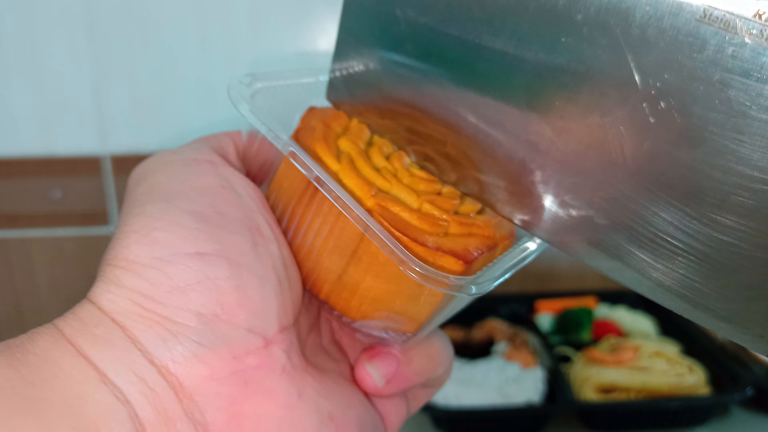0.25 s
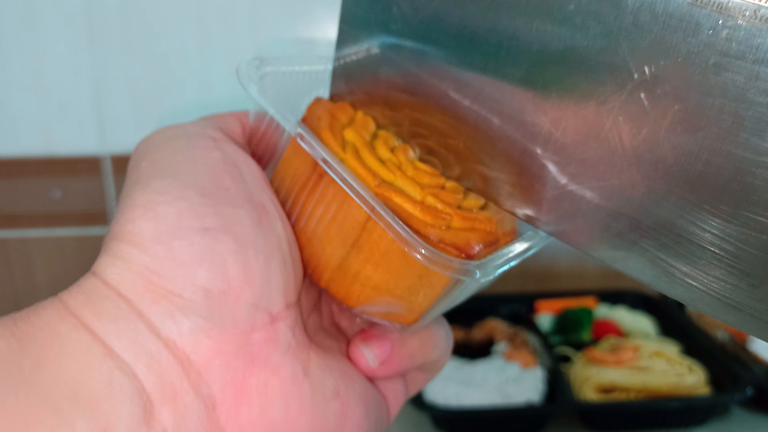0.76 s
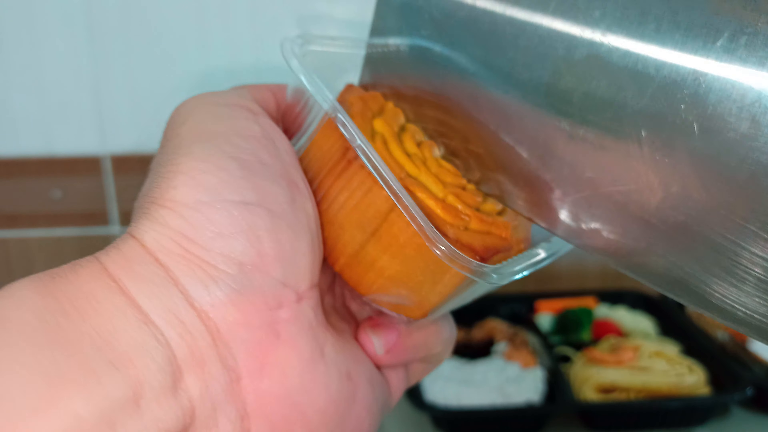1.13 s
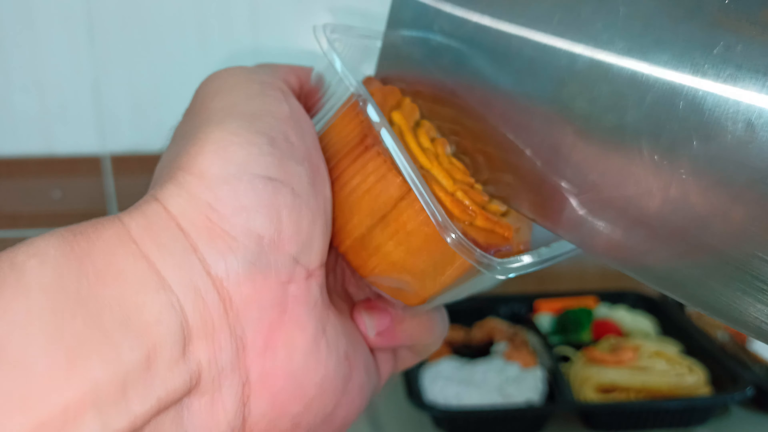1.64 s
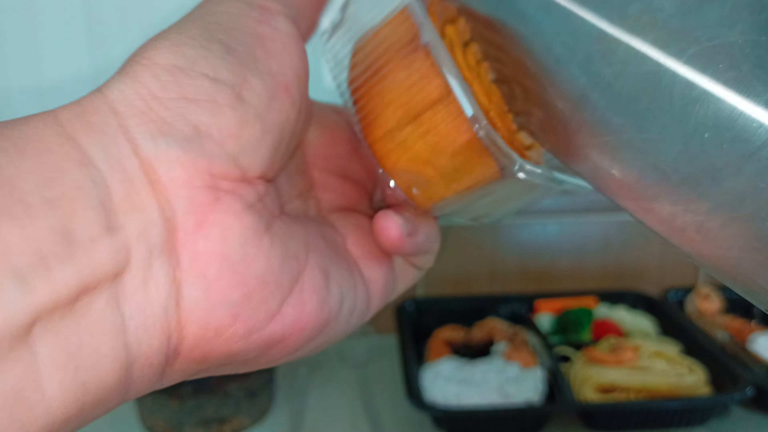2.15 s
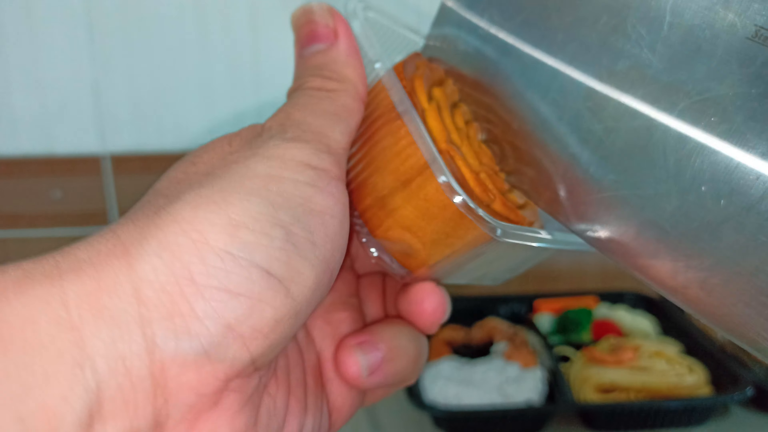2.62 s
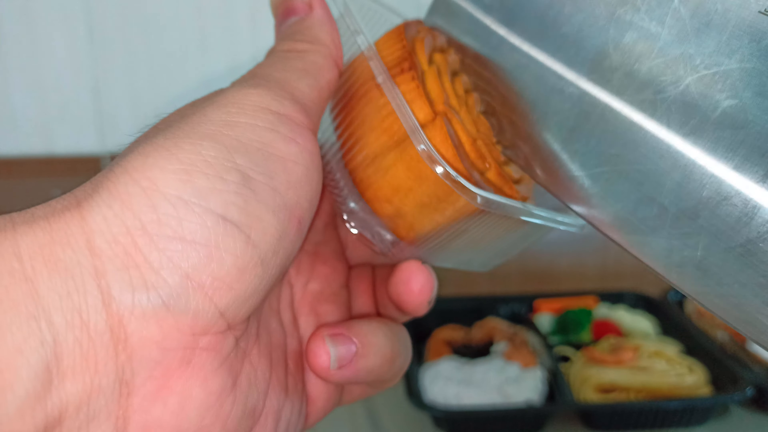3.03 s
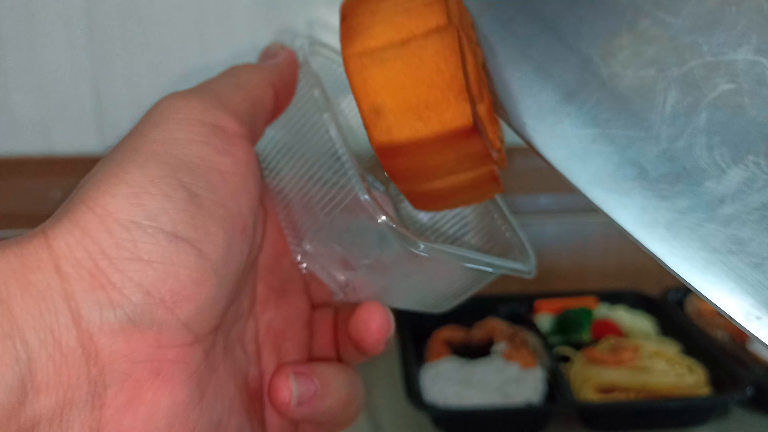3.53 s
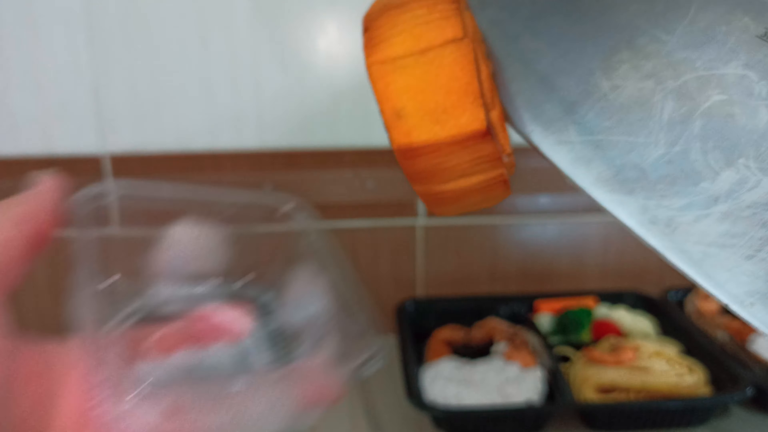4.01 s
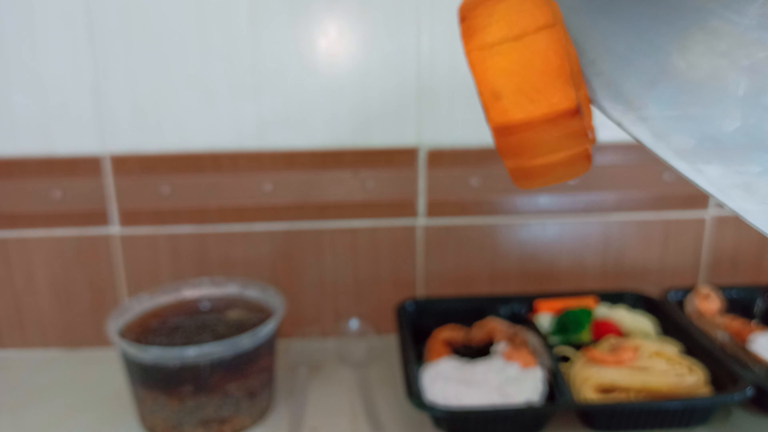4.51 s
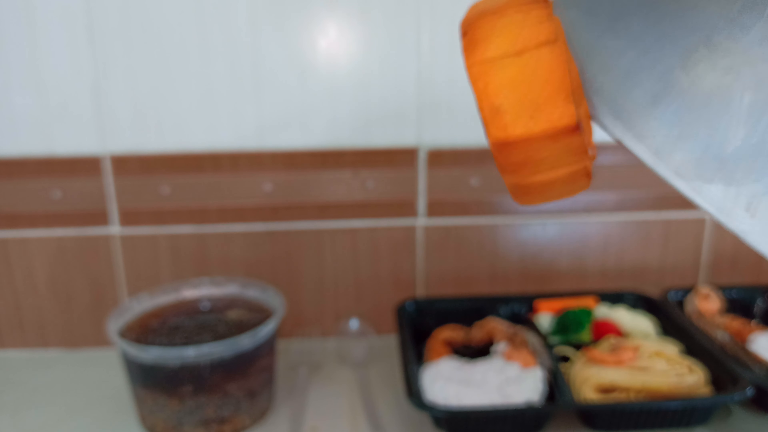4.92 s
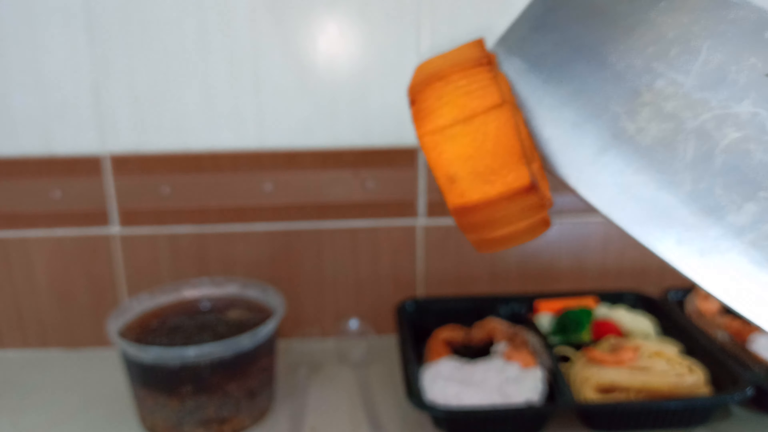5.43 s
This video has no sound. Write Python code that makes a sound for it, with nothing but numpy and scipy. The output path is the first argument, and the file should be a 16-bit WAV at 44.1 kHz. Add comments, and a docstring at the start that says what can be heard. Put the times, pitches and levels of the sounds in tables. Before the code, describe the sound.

A thin plastic tray snaps and crackles as a hand flexes it, followed by soft brushing and a dull clatter over a low hum.

```python
"""Flexing a plastic food tray

A hand flexes a thin tray in a tiled room until a pastry comes free on a metal blade. Panels buckle
in sharp snaps, creases tick, fingers rub. Soft brushing, scrapes and a dull clatter follow.
A refrigerator hums low; a limiter ducks around the loudest snaps."""
import sys
import numpy as np
from scipy import signal
from scipy.fft import rfft, irfft
from scipy.io import wavfile
from scipy.ndimage import uniform_filter1d, minimum_filter1d

SR = 44100
rng = np.random.default_rng(int(sys.argv[2]) if len(sys.argv) > 2 else 0)


def inscribe(sig):
    """Save sig as 16-bit PCM at rate SR to the path in sys.argv[1].

    A 1-D sig is mono; a 2-D sig holds one channel per row.
    Samples are clipped to [-1, 1] before scaling.
    """
    pcm = np.round(np.clip(np.atleast_2d(sig).T, -1, 1) * 32767)
    wavfile.write(sys.argv[1], SR, pcm.astype(np.int16))


N = 249606
HIT_SAMPLES = 8192
HIT_S, HIT_HZ = np.arange(HIT_SAMPLES) / SR, np.fft.rfftfreq(HIT_SAMPLES, 1 / SR)
TEN_MS_GAIN = np.sqrt(SR / 100)  # energy 1 to rms 1 over 10 ms
LET_GO_S = 3.07

# Colour shared by the last two snaps, one loud, bright double crack.
# Each row: frequency in Hz, gain in dB.
RELEASE = [(300, -22), (1000, -13.5), (1400, -12), (1900, -35), (2850, -5), (3700, -18), (4500, 0),
           (7200, 1.5), (8300, -7.5), (10200, -14), (13000, -12), (16000, -15.5)]


def amp(db):
    """Decibels to gain."""
    return 10 ** (np.asarray(db) / 20)


def unit_rms(x):
    """Scale to rms 1."""
    return x / np.sqrt(np.mean(x ** 2) + 1e-20)


def unit_energy(x):
    """Scale to energy 1."""
    return x / np.linalg.norm(x)


def curve_at(points, hz):
    """Interpolate (Hz, value) points over log frequency."""
    point_hz, value = np.transpose(points)
    return np.interp(np.log(hz + 1), np.log(point_hz + 1), value)


def add(mix, start_s, sound):
    """Mix a sound in place."""
    part = mix[round(start_s * SR):][:len(sound)]
    part += sound[:len(part)]


def decay(t60_s):
    """Exponential envelope of one hit."""
    return np.exp(-np.log(1000) * HIT_S / t60_s)


def mode(hz, db, t60_s):
    """One damped sine."""
    return amp(db) * decay(t60_s) * np.sin(2 * np.pi * hz * HIT_S)


def crack(flutter_db, t60_s):
    """An impulse, then dense flutter; flutter_db is its energy against the impulse."""
    drive = amp(flutter_db) * unit_energy(rng.standard_normal(HIT_SAMPLES) * decay(t60_s))
    drive[0] = 1
    return drive


def strike(drive, colour_db):
    """Minimum-phase colouring of one hit; energy 1."""
    log_gain = np.log(amp(np.maximum(colour_db, -90)))
    mirrored = np.concatenate([log_gain, log_gain[-2:0:-1]])
    log_spectrum = np.conj(signal.hilbert(mirrored))[:len(HIT_HZ)]
    response = irfft(np.exp(log_spectrum))
    return unit_energy(signal.fftconvolve(drive, response)[:HIT_SAMPLES])


def tint(x, colour):
    """Colour a scene-length signal; rms 1."""
    hz = np.fft.rfftfreq(N, 1 / SR)
    return unit_rms(irfft(rfft(x) * amp(curve_at(colour, hz)), N))


def drift(rate_hz):
    """Slow random motion; rms 1."""
    hz = np.fft.rfftfreq(N, 1 / SR)
    low_pass = np.exp(-(hz / rate_hz) ** 2)
    return unit_rms(irfft(rfft(rng.standard_normal(N)) * low_pass, N))


def fridge_hum(waver_hz=0.86, waver_db=3, steadier_hz=600):
    """Motor hum; the low lines waver most in level."""
    # Each row: frequency in Hz, rms level in dB.
    lines = [(97, -65), (145.5, -54.5), (242.8, -61.5), (292, -64.5), (488.5, -63.5), (1806, -74)]
    out = np.zeros(N)
    for hz, db in lines:
        level = amp(db + waver_db / (1 + hz / steadier_hz) * drift(rate_hz=2.6))
        phase = 2 * np.pi * np.cumsum(hz + waver_hz * drift(rate_hz=4.3)) / SR
        out += level * np.sqrt(2) * np.sin(phase)
    return out


def room_air(rms_db=-51.5):
    """Steady air noise and hiss."""
    # Each row: frequency in Hz, gain in dB.
    colour = [(24, -51.5), (36, -31.5), (50, 3.5), (70, -5.5), (110, 4.5), (190, -6.5), (310, -3.5),
              (430, -13.5), (630, -15), (1300, -22), (1800, -24), (2500, -29), (4000, -26), (6500, -33.5),
              (8000, -24.5), (9200, -42.5), (16000, -39)]
    return amp(rms_db) * tint(rng.standard_normal(N), colour)


def handling(work_db=-48, idle_db=-57.5, rise_s=0.5, fall_s=0.23):
    """Hand rumble builds with the grip and sinks to idle once the pastry is out."""
    # Each row: frequency in Hz, gain in dB.
    colour = [(24, -57.5), (36, -30), (52, -13), (100, 2.5), (200, -3.5), (400, -2.5), (600, -17.5),
              (1500, -25), (4000, -48.5)]
    t = np.arange(N) / SR
    effort = (1 - np.exp(-t / rise_s)) * np.exp(-np.maximum(t - LET_GO_S, 0) / fall_s)
    level = np.hypot(amp(idle_db), amp(work_db) * effort)
    return level * tint(rng.standard_normal(N), colour)


def crease(peak_db, hz, treble_db, q=1.76):
    """A crease gives way: a tiny crack through one broad resonance, plus treble."""
    resonance = 1 / np.hypot(1, q * (HIT_HZ / hz - hz / (HIT_HZ + 1)))
    treble = amp(treble_db) * HIT_HZ / np.hypot(HIT_HZ, 5000)
    colour_db = 20 * np.log10(np.hypot(resonance, treble))
    sound = strike(crack(flutter_db=3.5, t60_s=0.018), colour_db)
    return amp(peak_db) * sound / abs(sound).max()


def crackle(grip_s=0.05, per_s=16, peak_db=-40, spread_db=1.5, centre_hz=4400, spread_octaves=0.35):
    """Faint creases while the hand flexes the tray, one at a random time in each slot."""
    out = np.zeros(N)
    for slot_s in np.arange(grip_s, LET_GO_S, 1 / per_s):
        strength, pitch = rng.standard_normal(2)
        hz = centre_hz * 2 ** (spread_octaves * pitch)
        sound = crease(peak_db + spread_db * strength, hz, treble_db=-14)
        add(out, slot_s + rng.random() / per_s, sound)
    return out


def friction(strokes, colour, slips_per_s=2500, spread_db=2.0, edge_db=-20):
    """Dense, uneven slips; each stroke is at edge_db one rise before and one fall after its peak."""
    slips = (rng.random(N) < slips_per_s / SR) * rng.choice([-1, 1], N)
    sizes = amp(spread_db * np.minimum(rng.exponential(1, N), 4))
    t = np.arange(N) / SR
    envelope = np.zeros(N)
    for peak_s, rise_s, fall_s, db in strokes:
        off_peak = np.maximum((peak_s - t) / rise_s, (t - peak_s) / fall_s)
        envelope += amp(db + edge_db * off_peak)
    return tint(slips * sizes, colour) * envelope


def finger_rubs():
    """Fingers slide on the plastic."""
    # Each row: peak time, rise and fall in seconds, level in dB.
    strokes = [(.14, .04, .07, -56.5), (.88, .04, 0.4, -49), (1.94, .035, 0.025, -50),
               (2.076, .022, 0.013, -33.5)]
    # Each row: frequency in Hz, gain in dB.
    colour = [(300, -5.5), (1200, -12), (2800, -8), (6000, -7.5), (8500, -12), (11000, -30), (16000, -15.5)]
    return friction(strokes, colour)


def ticks():
    """The larger creases give way one by one."""
    # Each row: start in seconds, peak level in dB, resonance in Hz, treble in dB.
    creases = [(0.149, -31.5, 2650, -27), (0.163, -26.5, 3700, -9), (0.21, -38, 3170, -18),
               (0.241, -29, 2460, -9), (0.303, -27.5, 2580, -15), (.905, -23.5, 5360, -20),
               (1.029, -26.5, 2570, -40), (1.4427, -29.5, 2760, -13), (1.8292, -36, 5000, -7),
               (2.094, -11, 3550, -20), (2.1112, -19.5, 3164, -13), (2.123, -10, 3000, -23),
               (2.132, -14, 3050, -24), (2.3985, -24.5, 3000, -26), (2.4436, -23, 3060, -32),
               (2.494, -20, 4550, -25), (2.5332, -26, 2870, -31), (2.705, -25, 1950, -13.5),
               (2.8648, -29.5, 2430, -34), (2.872, -29.5, 2650, -25), (2.9959, -32.5, 2430, -35),
               (4.646, -32, 14000, 7)]
    out = np.zeros(N)
    for start_s, peak_db, hz, treble_db in creases:
        add(out, start_s, crease(peak_db, hz, treble_db))
    return out


def snaps(evenness=0.46, lift_db=2, bounce_db=-14, bounce_t60_s=0.12):
    """Panels buckle with a crack and flutter. Returns direct sound and a more evenly coloured send."""
    # Each row: start in seconds, level over 10 ms in dB, flutter in dB, flutter t60 in seconds,
    # relative ring level in dB, colour as (Hz, dB) points.
    panels = [ (0.3307, -13.5, -8, 0.033, -29, [(300, -16), (600, -38), (1000, -23.5), (1400, -22.5),
              (2050, -3), (2800, 0), (5100, -2.5), (7200, -8), (11000, -15.5), (14000, -7), (16000, -22)]),
              (0.51, -15, 3.5, 0.017, -24, [(300, -29), (600, -18), (1000, 0), (1800, -15.5), (2800, 4),
              (4500, -1), (7100, 9.5), (9500, -0.5), (12000, -6), (15200, 8), (16000, 0)]),
              (0.5347, -28, -4.5, 0.06, -31, [(250, -27), (400, -0.5), (630, -22), (900, -10), (1900, -11),
              (2670, 4.5), (3300, -3.5), (5000, -5.5), (7600, -17), (11000, -18), (16000, -26)]),
              (0.6524, -15.5, -1, 0.014, -28, [(300, -23), (600, -31), (1000, -14), (1400, -18.5),
              (1850, -4.5), (2350, -8.5), (2800, 6), (3700, -1.5), (4600, -6), (5600, -24.5), (7300, -5),
              (10000, -12), (13000, -13), (15200, -12.5)]), (1.4540, -28, -5, 0.074, -20, [(350, -34),
              (750, 7), (1350, -5), (1600, -8), (2450, -3), (2820, 5), (3200, -0.5), (6300, -8),
              (7300, -0.5), (9500, -10), (12000, -11), (15300, -9.5)]),
              (1.9974, -30.5, -6, 0.062, -27.5, [(300, -10.5), (550, -14), (830, 6), (1400, -13.5),
              (2400, -14), (2750, 2), (3200, -10.5), (4440, 2), (5600, -23), (8000, -18.5), (11000, -49.5),
              (16000, -39.5)]), (2.0790, -10, 3.5, 0.039, -11, [(300, -23), (640, -27.5), (1100, -8),
              (1450, -23), (1750, -3), (2000, -12), (2400, -3), (3000, -9), (4200, -9), (7000, -16.5),
              (11000, -29.5), (16000, -28.5)]), (2.1417, -4, 5, 0.014, -29, RELEASE),
              (2.1436, -12.5, 21.5, 0.053, -25, RELEASE)]
    # Thin, bright ringing after each snap.
    # Each row: frequency in Hz, relative level in dB, t60 in seconds.
    ring_lines = [(1020, -9, .06), (1779, 0, .16), (2406, 0, .1), (2705, -2, .08), (3416, -2, .07),
                  (3562, -3, .05), (4249, 0, .08), (4597, -5, .07), (5227, -3, .07), (5838, -4, .08),
                  (7126, -5, .06)]
    ring = unit_energy(sum(mode(*row) for row in ring_lines))
    direct, send = np.zeros((2, N))
    for start_s, db, flutter_db, t60_s, ring_db, colour in panels:
        colour_db = curve_at(colour, HIT_HZ)
        smooth_db = uniform_filter1d(colour_db, size=900)
        diffuse_db = (1 - evenness) * colour_db + evenness * smooth_db + lift_db * HIT_HZ / HIT_HZ[-1]
        panel = strike(crack(flutter_db, t60_s), colour_db)
        # quick reflections between tray, blade and counter
        bounces = strike(rng.standard_normal(HIT_SAMPLES) * decay(bounce_t60_s), diffuse_db)
        gain = amp(db) * TEN_MS_GAIN
        add(direct, start_s, gain * (panel + amp(ring_db) * ring + amp(bounce_db) * bounces))
        add(send, start_s, gain * strike(signal.unit_impulse(HIT_SAMPLES), diffuse_db))
    return direct, send


def wall_pops():
    """A whole tray wall pops through and rings in one mode, damped by the hand."""
    # Each row: start in seconds, initial level in dB, pitch in Hz, t60 in seconds.
    walls = [(1.4555, -16, 373, 0.066), (1.456, -23, 2760, 0.01), (2.0776, -20.5, 308, 0.053),
             (2.08, -31.5, 1050, 0.012), (2.1420, -5, 114, 0.0093), (2.538, -32, 1000, 0.035)]
    out = np.zeros(N)
    for start_s, db, hz, t60_s in walls:
        add(out, start_s, mode(hz, db, t60_s))
    return out


def brushes(rise_share=0.36):
    """Soft, bright strokes once the tray is off: quick swell, longer fade."""
    # Each row: peak time and length in seconds, level in dB.
    sweeps = [(3.13, 0.14, -56), (3.49, 0.097, -59.5), (4.417, 0.11, -50.5), (4.528, 0.18, -56),
              (4.595, 0.14, -53.5), (4.788, 0.13, -54), (4.928, 0.11, -56.5), (5.17, 0.1, -56)]
    # Each row: frequency in Hz, gain in dB.
    colour = [(400, 8), (1200, -0.5), (2200, 3.5), (3200, 1), (4200, 5.5), (6000, 2), (8000, 4),
              (11500, -5.5), (15000, 4), (16000, -3.5)]
    strokes = [(peak_s, length_s * rise_share, length_s * (1 - rise_share), db)
               for peak_s, length_s, db in sweeps]
    return friction(strokes, colour)


def scrapes():
    """Short, creaky friction before and between the knocks."""
    # Each row: peak time, rise and fall in seconds, level in dB.
    strokes = [(4.18, 0.019, .05, -61), (4.781, 0.013, .03, -55.5), (5.302, 0.0081, 0.036, -43.5),
               (5.33, 0.016, .12, -45.5), (5.43, .05, .055, -48)]
    # Each row: frequency in Hz, gain in dB.
    colour = [(300, -17.5), (800, -7), (1050, 3.5), (1350, -14), (1750, 0.5), (2300, -5.5), (2550, 1),
              (2900, -0.5), (3300, -8.5), (3800, -10), (8000, -16), (16000, -23)]
    return friction(strokes, colour)


def knocks(ring_db=-9):
    """Something is set down further off: blunt blows rattle and leave a short ring."""
    # Each row: start in seconds, level over 10 ms in dB, rattle t60 in seconds, treble in dB.
    blows = [(5.3315, -34, 0.15, -3), (5.375, -33, 0.081, 4), (5.387, -32.5, 0.48, -2.5),
             (5.44, -43, 0.047, -2)]
    # Each row: frequency in Hz, gain in dB.
    colour = [(120, -20), (230, -0.5), (325, 8.5), (420, 2), (560, 1), (1050, -5), (1350, -3.5),
              (1700, -4.5), (2300, -7.5), (3200, -5.5), (5500, -6), (8000, -6.5), (10000, -19.5),
              (16000, -18.5)]
    # Each row: frequency in Hz, relative level in dB, t60 in seconds.
    object_modes = [(323.7, 4, 0.36), (1670, -7, 0.63), (2190, -8, .25), (2840, -6, 0.26),
                    (3272, -3.5, 0.25)]
    ring = unit_energy(sum(mode(*row) for row in object_modes))
    out = np.zeros(N)
    for start_s, db, t60_s, treble_db in blows:
        colour_db = curve_at(colour, HIT_HZ) + treble_db * HIT_HZ / (HIT_HZ + 3000)
        rattle = strike(crack(flutter_db=11.5, t60_s=t60_s), colour_db)
        add(out, start_s, amp(db) * TEN_MS_GAIN * (rattle + amp(ring_db) * ring))
    return out


def tiled_room(send, build_up_s=0.0036):
    """Hard walls: a diffuse tail builds up, then each band decays at its own rate."""
    # Each row: frequency in Hz, t60 in seconds.
    decay_times = [(150, 0.24), (500, 0.95), (1300, 0.96), (3500, 0.89), (8000, 0.7), (15000, 0.6)]
    hz, t, noise = signal.stft(rng.standard_normal(SR), SR, nperseg=256)
    band_decay = np.exp(-np.log(1000) * t / curve_at(decay_times, hz)[:, None])
    onset = 1 - np.exp(-t / build_up_s)
    _, tail = signal.istft(noise * band_decay * onset, SR)
    return signal.fftconvolve(send, unit_energy(tail))[:N]


def scene():
    """Mono mix; four groups feed the room, each at its own level."""
    background = fridge_hum() + room_air() + handling()
    snap_direct, snap_send = snaps()
    pops = wall_pops()
    clatter = knocks() + scrapes()
    small_sounds = ticks() + finger_rubs() + brushes() + crackle()
    send = amp(-15) * snap_send + amp(-7.5) * small_sounds + amp(-9) * pops + amp(-12.5) * clatter
    return (snap_direct + small_sounds + pops + clatter + tiled_room(send) + background)[None]


def record(dry, low_hz=41, high_hz=16100, ceiling_db=0, look_ahead_s=0.032, recovery_db_per_s=240):
    """Bass cut, look-ahead limiter with quick recovery, low-pass."""
    sound = signal.sosfilt(signal.butter(4, low_hz, "high", fs=SR, output="sos"), dry[0])
    window = int(look_ahead_s * SR)
    half = window // 2
    over_db = np.maximum(20 * np.log10(abs(sound) + 1e-9) - ceiling_db, 0)
    ahead_db = -minimum_filter1d(-over_db, window, origin=-half)  # largest overshoot just ahead
    recovery_db = np.arange(N) / SR * recovery_db_per_s
    wanted_db = np.maximum.accumulate(ahead_db + recovery_db) - recovery_db
    duck_db = signal.oaconvolve(wanted_db, np.ones(half) / half)[:N]  # the gain glides down
    low_pass = signal.firwin(255, high_hz, window=("kaiser", 8), fs=SR)
    return signal.oaconvolve(sound * amp(-duck_db), low_pass, "same")[None]


dry = scene()
out = record(dry)
inscribe(out)
```